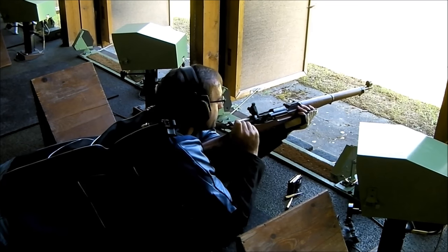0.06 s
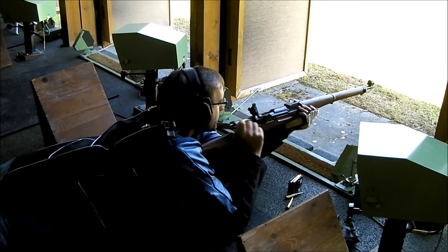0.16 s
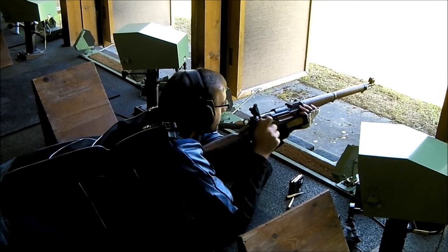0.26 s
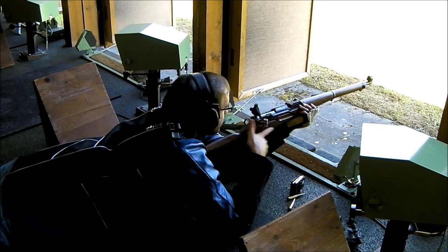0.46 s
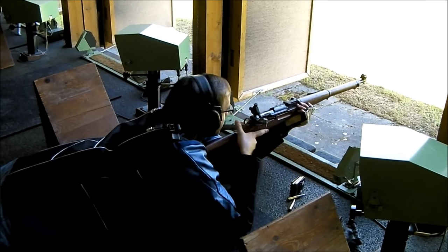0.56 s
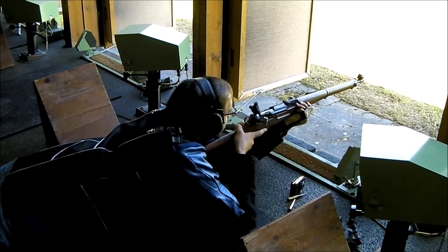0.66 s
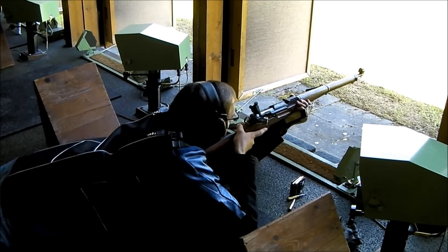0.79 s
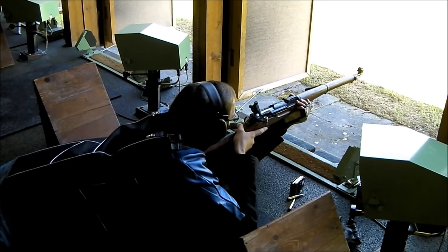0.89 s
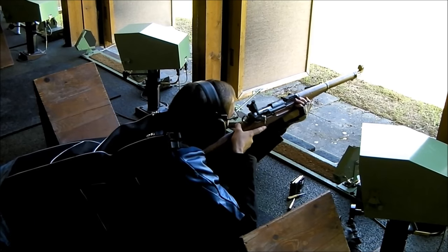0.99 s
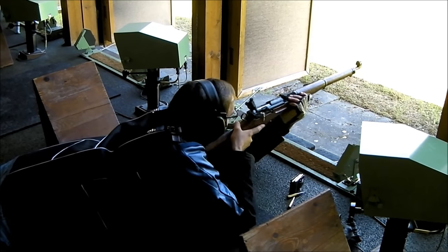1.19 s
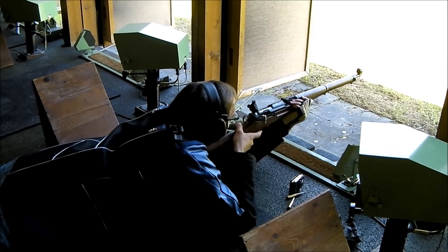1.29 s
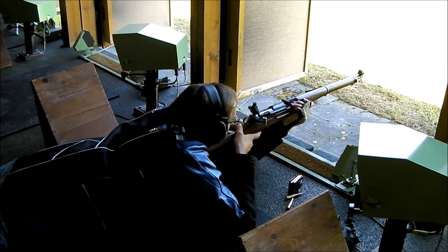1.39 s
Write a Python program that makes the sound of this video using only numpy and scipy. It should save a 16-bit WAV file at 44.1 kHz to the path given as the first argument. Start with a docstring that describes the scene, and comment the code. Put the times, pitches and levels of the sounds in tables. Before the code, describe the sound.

Close stereo pickup in a wooden shooting shelter: rattling rifle bolt clacks end in a small dull thud, with short echoes, then delicate brass case bounces to the right, quiet clothing movement and low air noise.

```python
"""A rifle bolt is worked in a wooden shooting shelter: rattles of contacts drive ringing steel modes.
The spent brass case bounces to the right: filtered ticks, each damping and restarting decaying sines.
A low sine thuds as the bolt goes home; sparse decaying taps give the shelter's echoes.
Shaped noise makes the outdoor hum, cloth rustle, soft low shuffles and the tail of a clack just gone."""
import sys
import numpy as np
from scipy import signal
from scipy.io import wavfile
from scipy.ndimage import uniform_filter1d

SR = 44100
rng = np.random.default_rng(int(sys.argv[2]) if len(sys.argv) > 2 else 0)


def to_wav(s):
    """Save 16-bit WAV."""
    ch = np.atleast_2d(s).T  # columns
    pcm = np.round(np.clip(ch, -1, 1) * 32767)  # PCM
    wavfile.write(sys.argv[1], SR, pcm.astype(np.int16))


N = 63945


def amp(db):
    """Amplitude ratio of a level in dB."""
    return 10 ** (np.asarray(db) / 20)


def unit_rms(x):
    """Scale to an RMS of 1."""
    return x / np.sqrt(np.mean(x ** 2) + 1e-20)


def read_curve(points, hz):
    """Interpolate (frequency, value) points along log frequency."""
    point_hz, value = np.transpose(points)
    return np.interp(np.log(hz + 1), np.log(point_hz + 1), value)


def add(mix, start_s, sound):
    """Add a sound at its start time, cut at the end of the mix."""
    part = mix[..., round(start_s * SR):][..., :sound.shape[-1]]
    part += sound[..., :part.shape[-1]]


def colour(x, points):
    """Minimum-phase filter with the given (frequency [Hz], gain [dB]) response."""
    log_gain = np.log(amp(read_curve(points, abs(np.fft.fftfreq(4096, 1 / SR)))))
    spectrum = np.exp(np.conj(signal.hilbert(log_gain)))
    taps = np.fft.ifft(spectrum).real[:2048]
    return signal.fftconvolve(x, taps)[:len(x)]


def modes(table, t, spread_db):
    """Sum of exponentially decaying sines (Hz, dB, t60 s), strengths spread at random."""
    hz, db, t60 = np.transpose(table)[:, :, None]
    chance = rng.standard_normal((len(table), 1))
    envelope = amp(db + spread_db * chance - 60 * t / t60)
    return (envelope * np.sin(2 * np.pi * hz * t)).sum(0)


# left-right likeness: (frequency [Hz], correlation [0..1])
LIKENESS = [(1000, .993), (3000, 0.99), (8000, .75)]


def widen(z):
    """Mix two independent spectra into a stereo pair, correlated by band."""
    same = np.clip(read_curve(LIKENESS, np.linspace(0, SR / 2, z.shape[1])), 0, 1)[:, None]
    return np.array([z[0], same * z[0] + np.sqrt(1 - same ** 2) * z[1]])


def hiss(points, patchy_db, size):
    """Unit-RMS stereo noise of a given spectrum, its level drifting in time-frequency patches."""
    a, b, c, d, patches = rng.standard_normal((4 * N // size + 5, size // 2 + 1, 5)).T
    patches = uniform_filter1d(patches, size=6, axis=0)
    patches = unit_rms(uniform_filter1d(patches, size=6, axis=1))
    spectrum_db = read_curve(points, np.linspace(0, SR / 2, len(a)))[:, None]
    z = widen(np.array([a + 1j * b, c + 1j * d])) * amp(spectrum_db + patchy_db * patches)
    return unit_rms(signal.istft(z, nperseg=size, noverlap=3 * size // 4)[1][:, :N])


# outdoor air spectrum: (frequency [Hz], relative level [dB])
AIR_SPECTRUM = [(20, -31.5), (55, -19.5), (101, -2.5), (150, -9.5), (260, -21.5), (334, -10), (430, -1),
                (560, -12.5), (800, -15), (1200, -18.5), (2500, -30.5), (6800, -23.5), (7600, -29),
                (12100, -29.5), (15500, -38)]
AIR_RMS_DB = -55


def outdoor_air():
    """Broad air noise with a low hum: steady noise with low spectral peaks."""
    return amp(AIR_RMS_DB) * hiss(AIR_SPECTRUM, patchy_db=3.0, size=2048)


# cloth moving: (time [s], level [dB])
RUSTLE_LEVEL = [(.46, -68.5), (.57, -53), (.64, -59.5), (.69, -62.5), (.74, -48.5), (.79, -61), (.86, -65),
                (1.0, -61.5), (1.2, -56.5), (1.42, -62.5)]
# cloth spectrum: (frequency [Hz], relative level [dB])
CLOTH_SPECTRUM = [(500, -8), (1000, -9), (2160, -3), (4000, -8), (7500, -16.5), (15500, -24.5)]


def cloth_rustle():
    """Cloth friction: patchy noise following a level curve."""
    time_s, db = np.transpose(RUSTLE_LEVEL)
    level_db = np.interp(np.linspace(0, N / SR, N), time_s, db)
    return amp(level_db) * hiss(CLOTH_SPECTRUM, patchy_db=3.5, size=256)


def earlier_clack():
    """Tail of a clack just gone: shaped noise dying from the start."""
    start_db, t60_s = -51.5, 0.22
    noise = colour(rng.standard_normal(N), [(1500, -12.0), (5500, 0), (10000, -4), (15500, -25.5)])
    return unit_rms(noise) * amp(start_db - 60 * np.arange(N) / SR / t60_s)


# modes of the action: (frequency [Hz], width [Hz], relative level before favouring and spread [dB])
ACTION_MODES = [(855, 350, -7.5), (1920, 150, -18.5), (2900, 750, -12.5), (3267, 90, -1), (3900, 730, -2),
                (4420, 160, -10), (5200, 720, 0.5), (6300, 810, 5), (10060, 660, -3.5)]
# colour of the crack: (frequency [Hz], relative level [dB])
CRACK_SPECTRUM = [(600, -27), (1440, -11.5), (2930, -1.5), (5330, -7), (7610, -10.5), (9930, -3),
                  (12100, -21), (15500, -41.5)]
FAVOUR_DB, FAVOUR_OCTAVES, SPREAD_DB = 11, 0.13, 3
RING_AT_0_DB = -2.5  # modes against crack, for a 0 dB clack
SOFT_RING = 0.63  # dB more ring per dB softer


def steel(drive, favour_hz, db):
    """Broad crack plus ringing action modes, those near the favoured pitch struck hardest."""
    t = np.arange(2048) / SR
    struck = []
    for hz, width_hz, mode_db in ACTION_MODES:
        octaves = np.log2(hz / favour_hz)
        lift_db = FAVOUR_DB * np.exp(-(octaves / FAVOUR_OCTAVES) ** 2)
        struck.append((hz, mode_db + lift_db, 2.2 / width_hz))
    ring = modes(struck, t, SPREAD_DB)
    crack = colour(t == 0, CRACK_SPECTRUM)
    ring_gain = amp(RING_AT_0_DB - SOFT_RING * db)
    response = crack / np.linalg.norm(crack) + ring_gain * ring / np.linalg.norm(ring)
    return signal.fftconvolve(drive, response)[:len(drive)]


def contacts(size, uneven_db=2):
    """Dense uneven clicks: noise with exponentially spread levels."""
    return rng.standard_normal(size) * amp(uneven_db * rng.exponential(1, size))


# bolt clacks: (time [s], level of 3 standard deviations over the first 200 samples [dB],
# filter gain at 6 kHz [dB], at 10 kHz [dB], favoured pitch [Hz], rattle decay constant [s])
BOLT_CLACKS = [(0.208, -21.5, 11, 1.5, 3205, 0.0028), (0.2378, -15, -5, -3, 6250, 0.0066),
               (0.2426, -7.5, -5.5, -4.5, 6000, 0.003), (0.2588, -15, 2.5, -9.5, 3900, 0.0031),
               (0.2706, -15.5, 4.5, -10, 2870, 0.0025), (0.2758, -8, -2.5, -5, 9700, 0.0045),
               (0.2779, -15, 0, -4, 2900, .0016), (0.2862, -4, 12, 8, 10000, 0.0011),
               (0.2889, 1.5, -4.5, 1.5, 6100, 0.0022), (0.2923, -4, 12, 0, 5100, 0.0009),
               (0.3, -5.5, -11.5, -4, 5000, 0.0036), (0.3081, -8.5, -3, -5, 2800, 0.0022),
               (0.32, -6.5, 1.5, -4.5, 6426, 0.0092), (0.3292, 4.5, 0, -1.5, 3260, 0.0052),
               (0.3448, 0.5, 7, 1, 5770, 0.0021), (0.349, -7, -2.5, -2.5, 4220, 0.00082),
               (0.354, -11.5, 13.5, 10.5, 8370, 0.0031)]


def bolt_clacks():
    """Each clack is a short decaying rattle of contacts into the steel."""
    out, t = np.zeros(N), np.arange(4096) / SR
    for start_s, db, mid_db, top_db, favour_hz, decay_s in BOLT_CLACKS:
        envelope = np.minimum(t / 0.0003, 1) * np.exp(-t / max(decay_s, 1e-4))
        hit = steel(contacts(len(t)) * envelope, favour_hz, db)
        hit = colour(hit, [(420, -22.5), (680, -0.5), (3500, -5.0), (6000, mid_db), (10000, top_db)])
        add(out, start_s, amp(db) * hit / (3 * np.std(hit[:200])))
    return out


def stock_thud():
    """The stock takes the blow as the bolt goes home: one decaying low sine."""
    start_s, db, hz, t60_s = 0.3298, -21, 380, 0.019
    out, t = np.zeros(N), np.arange(4096) / SR
    add(out, start_s, amp(db - 60 * t / t60_s) * np.sin(2 * np.pi * hz * t))
    return out


EARLY_DB, EARLY_S = -13, 0.008
SIDE_HZ = 1800  # below this both microphones hear nearly the same


def nearby(x):
    """Direct sound plus early reflections reaching two microphones up to a few samples apart."""
    taps = np.zeros((2, 2048))
    taps[:, 0] = 1
    for when, sign, skew in rng.random((8, 3)):
        at = 20 + round(when * EARLY_S * SR) + np.array([0, round(3 * skew - 1.5)])
        taps[[0, 1], at] += amp(EARLY_DB) * np.sign(sign - 0.5)
    pair = signal.fftconvolve(x, taps / np.linalg.norm(taps[0]), axes=1)[:, :N]
    mid = pair.mean(0)
    high_pass = signal.butter(4, SIDE_HZ, "high", fs=SR, output="sos")
    return mid + signal.sosfilt(high_pass, pair - mid)


# shelter decay at dying = 1: (frequency [Hz], t60 [s])
SHELTER_DECAY = [(300, 0.24), (2000, 0.13), (7000, 0.16)]


def shelter(x, gap_s, dying):
    """Sparse random-sign taps, each band dying at its own speed; dying divides the t60."""
    taps = np.zeros((2, SR // 2))
    at = np.arange(0, SR // 2, 10) + rng.integers(0, 10, (2, SR // 20))
    np.put_along_axis(taps, at, rng.choice([-1., 1.], at.shape), 1)
    hz, t, z = signal.stft(taps, SR, nperseg=256)
    decay = amp(-60 * dying * t / read_curve(SHELTER_DECAY, hz)[:, None])
    tail = signal.istft(widen(z) * decay, SR, nperseg=256)[1]
    tail[:, :round(gap_s * SR)] = 0
    tail = tail / np.linalg.norm(tail[0])
    return signal.fftconvolve(x, tail, axes=1)[:, :N]


# soft low movements: (time [s], level [dB])
SHUFFLE_TIMES = [(0.759, -53), (1.331, -50.5)]
SHUFFLE_HALF_WIDTH_S = 0.036  # to 1/e


def shuffles():
    """Soft low movements: dull noise under Gaussian swells."""
    t = np.arange(N) / SR
    swell = sum(amp(db) * np.exp(-((t - s) / SHUFFLE_HALF_WIDTH_S) ** 2) for s, db in SHUFFLE_TIMES)
    return swell * hiss([(100, -29.0), (400, 0.0), (1500, -16.5), (4000, -60)], patchy_db=2, size=1024)


# tick colour: (frequency [Hz], relative level [dB])
TICK_SPECTRUM = [(600, -30), (1200, -9), (6400, -11.5), (7740, -24), (12100, -25), (15500, -33)]
TICK_DECAY_S, TICK_LIFT_DB, TICK_OCTAVES = 0.0014, 8, 0.4
GRAIN_AT_0_DB = -27  # rises as bounces soften: they scrape more than they tick


def case_tick(db, tick_hz):
    """Dry impact: an impulse plus dying noise grain, lifted around the tick pitch."""
    t = np.arange(2048) / SR
    grain = rng.standard_normal(2048) * np.exp(-t / TICK_DECAY_S)
    tick = colour((t == 0) + amp(GRAIN_AT_0_DB - db / 2) * grain, TICK_SPECTRUM)
    ratio = 2 ** TICK_OCTAVES
    tick = colour(tick, [(tick_hz / ratio, 0), (tick_hz, TICK_LIFT_DB), (tick_hz * ratio, 0)])
    return amp(db) * tick / abs(tick).max()


# brass tube modes: (frequency [Hz], t60 [s])
BRASS_MODES = [(8508, 0.23), (11950, 0.12), (12975, 0.14)]
TWIN_BELOW_HZ, TWIN_DB = 35, -13


def brass_ring(rings_db, t):
    """Decaying tube modes, each with a weaker, slightly lower twin that beats with it."""
    ring = 0
    for db, (hz, t60) in zip(rings_db, BRASS_MODES):
        ring = ring + modes([(hz, db, t60), (hz - TWIN_BELOW_HZ, db + TWIN_DB, t60)], t, 0)
    return ring


# case bounces, levels before panning: (time [s], tick peak [dB], tick pitch [Hz],
# then level of each brass mode, low to high [dB])
CASE_BOUNCES = [(0.7399, -22.5, 3460, -51, -52, -53), (0.7467, -38, 1112, -50.5, -70, -69),
                (0.751, -36, 4550, -44.5, -55, -48), (.773, -38.5, 4540, -52.5, -59, -68),
                (1.0286, -19.5, 4900, -52, -75, -56), (1.0324, -33, 5500, -49, -75, -66),
                (1.0407, -35.5, 6300, -63, -70, -49), (1.072, -26, 4000, -50.5, -62, -56),
                (1.2067, -29.5, 6000, -70, -69, -69), (1.217, -37, 6000, -59, -77, -61.5),
                (1.2223, -28, 6460, -49, -47, -52), (1.228, -43, 4440, -40.5, -49, -51),
                (1.2333, -30, 6300, -35, -49, -50), (1.273, -58, 3940, -57, -70, -72),
                (1.3047, -35.5, 4970, -61, -80, -78), (1.321, -39.5, 4900, -51.5, -58, -65),
                (1.332, -36, 5430, -42.5, -58.5, -72)]
TICK_LEFT_OVER_RIGHT_DB, RING_LEFT_OVER_RIGHT_DB = -1, -6
RING_RISE_S, DAMP_DB = 0.0021, -14


def brass_case():
    """Each bounce is a dry tick that damps the brass tube and sets it ringing anew."""
    ticks, rings, t = np.zeros(N), np.zeros(N), np.arange(12000) / SR
    for start_s, db, tick_hz, *rings_db in CASE_BOUNCES:
        add(ticks, start_s, case_tick(db, tick_hz))
        later_s = [row[0] for row in CASE_BOUNCES if row[0] > start_s]
        damped_db = DAMP_DB * sum(np.clip((start_s + t - s) / RING_RISE_S, 0, 1) for s in later_s)
        ring = brass_ring(rings_db, t) * np.minimum(t / RING_RISE_S, 1)
        add(rings, start_s, ring * amp(damped_db))
    side = np.array([[0.5], [-0.5]])
    return ticks * amp(TICK_LEFT_OVER_RIGHT_DB * side), rings * amp(RING_LEFT_OVER_RIGHT_DB * side)


ACTION_WET_DB, RING_WET_DB, TICK_WET_DB = -10, -14, -5.5


def scene():
    """Bolt with early reflections, direct case sound, shelter echoes and outdoor layers."""
    background = outdoor_air() + cloth_rustle() + shuffles()
    action = (earlier_clack() + bolt_clacks() + stock_thud()) * np.ones((2, 1))
    ticks, rings = brass_case()
    wet = shelter(amp(ACTION_WET_DB) * action + amp(RING_WET_DB) * rings, gap_s=0.002, dying=1)
    # tick echoes come late and die faster
    wet += shelter(amp(TICK_WET_DB) * ticks, gap_s=0.005, dying=2)
    return nearby(action) + ticks + rings + wet + background


CEILING, EDGE_HZ = 1.05, 15900


def record(dry):
    """The loudest clacks overload the input; a low-pass and full-scale clip follow."""
    clipped = np.clip(dry, -CEILING, CEILING)
    low_pass = signal.firwin(511, EDGE_HZ, window=("kaiser", 9), fs=SR)
    return np.clip(signal.oaconvolve(clipped, low_pass[None], "same"), -1, 1)


dry = scene()
out = record(dry)
to_wav(out)
```